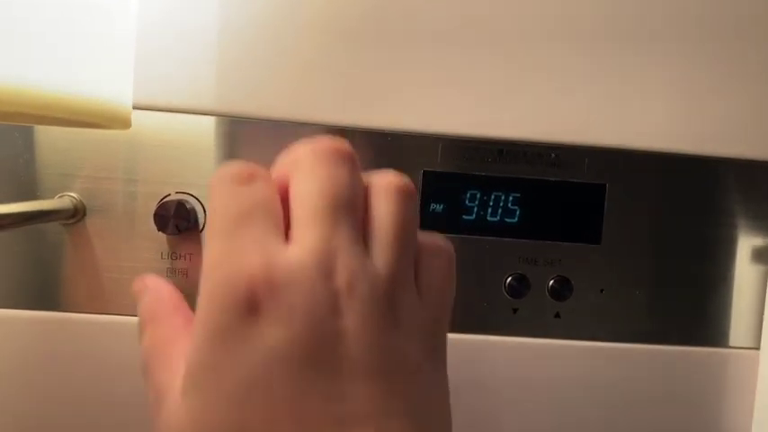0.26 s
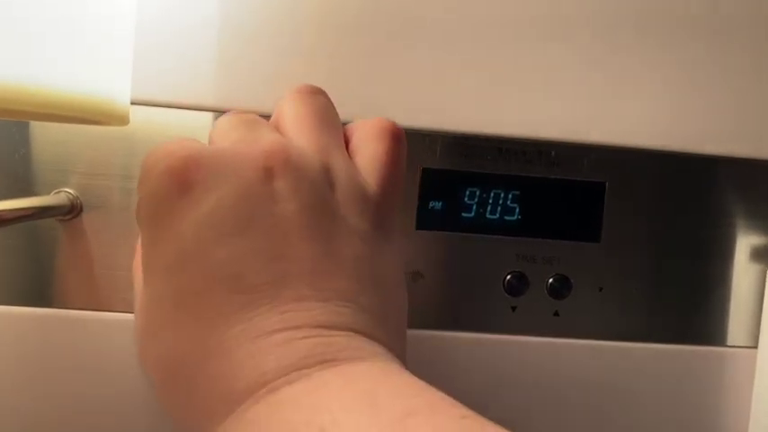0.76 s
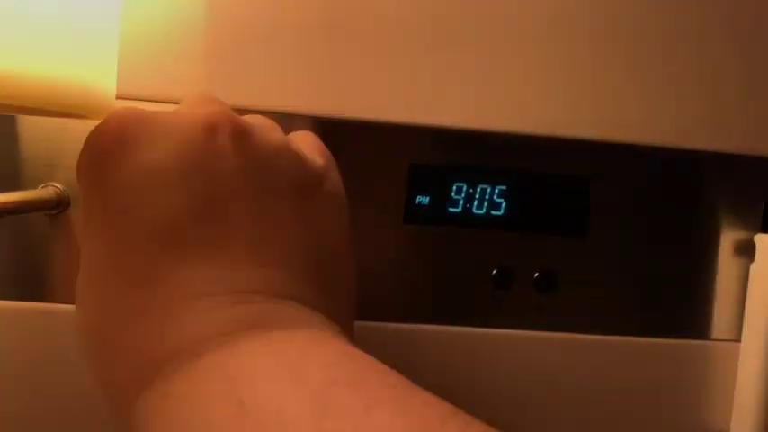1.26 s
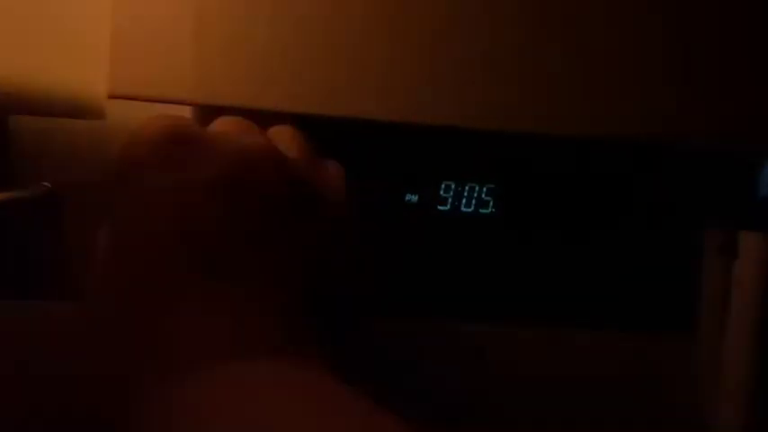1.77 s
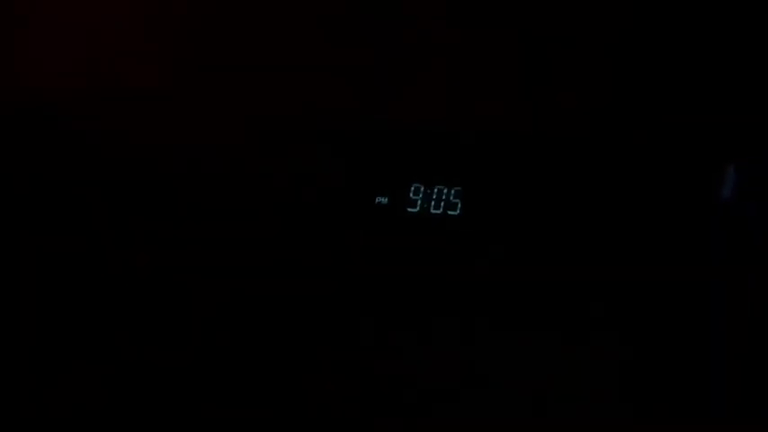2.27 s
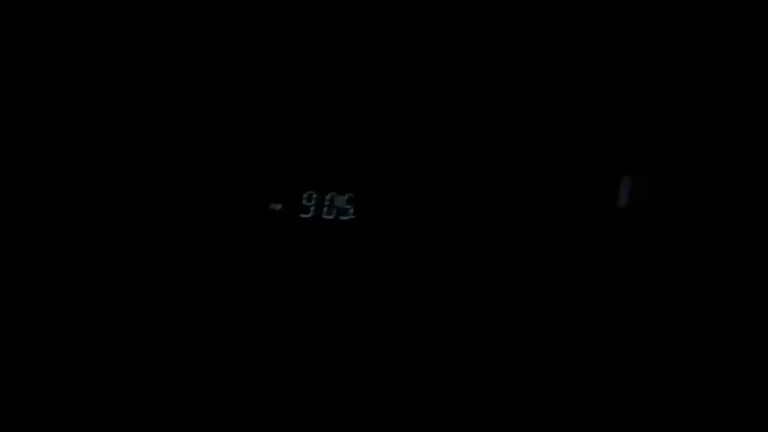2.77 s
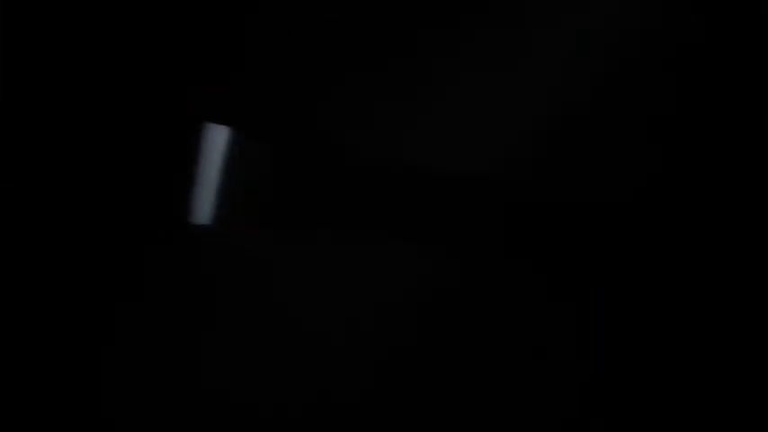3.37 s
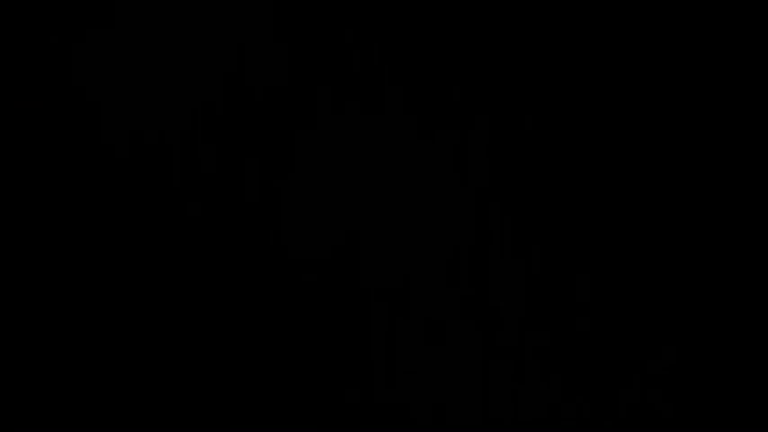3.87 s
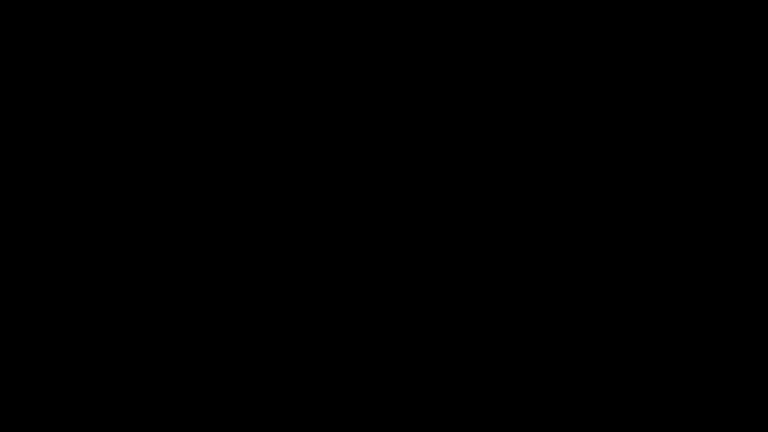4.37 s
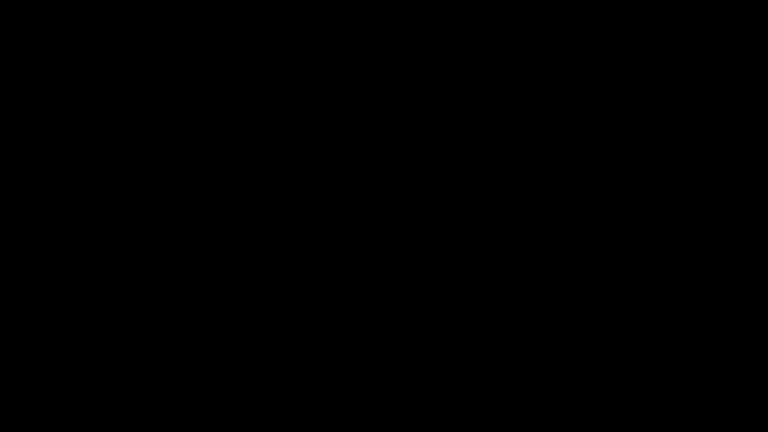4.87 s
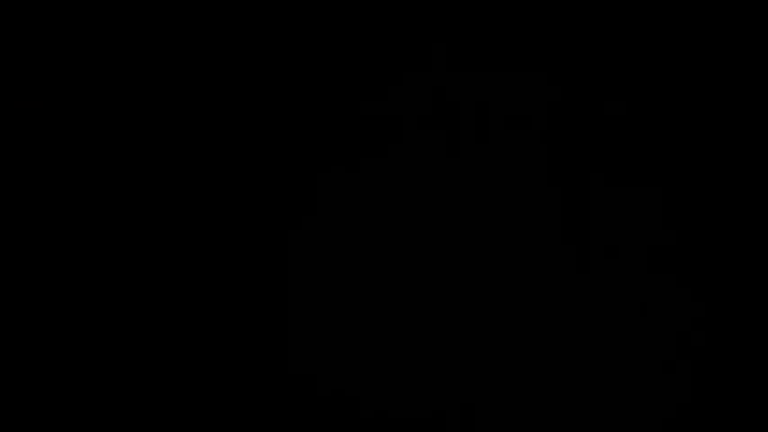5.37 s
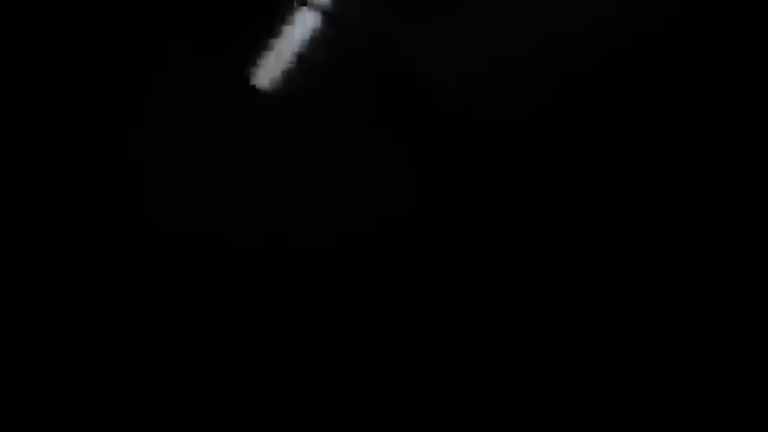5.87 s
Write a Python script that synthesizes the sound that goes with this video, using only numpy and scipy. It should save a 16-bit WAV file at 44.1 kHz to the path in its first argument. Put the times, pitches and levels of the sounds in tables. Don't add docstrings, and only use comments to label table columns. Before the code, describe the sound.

A rotary switch snaps over with a hard metallic clack in a small soft room, then cloth rushes and bumps close to the microphone.

```python
import sys
import numpy as np
from scipy import signal
from scipy.io import wavfile

SR = 44100
rng = np.random.default_rng(int(sys.argv[2]) if len(sys.argv) > 2 else 0)


def file_out(sig):
    cols = np.atleast_2d(sig).T
    lim = np.clip(cols, -1, 1)
    pcm = np.round(lim * 32767).astype(np.int16)
    wavfile.write(sys.argv[1], SR, pcm)


def amplitude_ratio(level_db):
    exponent = np.asarray(level_db, float) / 20
    return 10 ** exponent


N = 269451
LEFT_LAG = 20


def rms_one(x):
    return x / np.sqrt(np.mean(x ** 2) + 1e-20)


def in_time(rows):
    s, *columns = np.transpose(rows)
    return [np.interp(np.arange(N) / SR, s, c) for c in columns]


def at_hz(points, hz):
    points = np.array(points)
    return np.interp(np.log(hz), np.log(points[:, 0]), points[:, 1])


def band(x, low_hz, high_hz):
    edges = [low_hz, min(high_hz, .45 * SR)]
    return signal.sosfilt(signal.butter(2, edges, "band", fs=SR, output="sos"), x)


def low_pass(x, order, hz):
    return signal.sosfiltfilt(signal.butter(order, hz, fs=SR, output="sos"), x)


def drift(rate):
    r = np.exp(-80 * np.pi * rate / SR)
    slow = signal.lfilter([1], [1, -2 * r, r * r], rng.standard_normal(N // 40 + 2002))[2000:]
    return np.interp(np.arange(N) / 40, np.arange(len(slow)), rms_one(slow))


def ring(clicks, hz, t60):
    r = amplitude_ratio(-60 / (max(t60, .002) * SR))
    w = 2 * np.pi * hz / SR
    return signal.lfilter([0, np.sin(w)], [1, -2 * r * np.cos(w), r * r], clicks + 1e-18)


def clicks_at(times, db):
    clicks = np.zeros(N)
    clicks[np.round(np.array(times) * SR).astype(int)] = amplitude_ratio(np.array(db))
    return clicks


def at_time(s, sound, out):
    i = round(s * SR)
    return np.pad(sound, [(0, 0)] * (sound.ndim - 1) + [(i, N)])[..., :N] + out


def banded_noise(spectrum, patchy_db, shift_db=lambda hz: 0, source=None):
    # pitch in Hz, left-right likeness from -1 to 1.
    likeness = [(60, 0.2), (250, 0.58), (500, 0.31), (1200, 0.034), (3000, 0.036), (7000, 0.53),
                (15000, 0.031)]
    out, power, together = 0, 0, drift(7)
    edges = 22 * 2 ** np.arange(0, 9.6, .4)
    white = rng.standard_normal((2, 2, N)) * (1 if source is None else source)
    for k, (low, high) in enumerate(zip(edges, edges[1:])):
        mid, side = band(white[k % 2], low, high)
        hz = np.sqrt(low * high)
        alike = np.clip(at_hz(likeness, hz), -1, 1)
        pair = np.sqrt(1 + alike) * mid + np.sqrt(1 - alike) * side * [[1], [-1]]
        pair = amplitude_ratio(at_hz(spectrum, hz)) * pair
        power += np.mean(pair.mean(axis=0) ** 2)
        flicker_db = patchy_db * (.5 * together + (2.0 + 200 / hz) * drift(19.0))
        out = out + pair * amplitude_ratio(shift_db(hz) + flicker_db)
    return out / np.sqrt(power)


def ventilation():
    # pitch in Hz, level in dB per Hz.
    fan_spectrum = [(15, -40), (25, -16), (66, -10.5), (109, -10), (154, -21.5), (257, -26.5), (286, -27),
                    (438, -39), (673, -35.5), (833, -40.5), (978, -52.5), (1060, -44), (1720, -49),
                    (9520, -57.5), (15000, -58)]
    rumble_db, whine_db, whine_hz = -52.5, -97, 9780
    whine = amplitude_ratio(whine_db + 2.1 * drift(20)) * np.sin(2 * np.pi * whine_hz * np.arange(N) / SR)
    knots = np.log([150, 300, 700, 1500, 3000, 6300, 9000, 12000])
    cuts_db = [0, -1.5, -.5, -5, -8, -14, -10, -10.5]
    air = banded_noise(fan_spectrum, 0.49, lambda hz: np.interp(np.log(hz), knots, cuts_db))
    air = air + 0.52 * low_pass(air[::-1] - air, 2, 140)
    return amplitude_ratio(rumble_db + np.array([[1.3], [-1.3]])) * air + whine


def fidgets():
    # start in seconds, thud in dB, thud pitch in Hz, scuff in dB.
    touches = [(0.017, -70, 280, -92), (0.17, -66, 270, -73), (0.2, -74, 270, -74), (0.301, -60, 500, -92),
               (0.911, -60, 1000, -82), (0.95, -72, 700, -94), (1.078, -63, 400, -94),
               (1.148, -70, 650, -94), (1.195, -68, 400, -82), (1.294, -62, 650, -90),
               (1.303, -80, 700, -72), (1.315, -80, 700, -72), (1.424, -65, 1200, -88),
               (1.43, -66, 600, -90), (1.43, -71, 2100, -88), (1.455, -72, 2100, -90),
               (1.46, -66, 500, -94), (1.51, -72, 1400, -84), (1.53, -69, 1400, -76),
               (1.555, -68, 1350, -77), (1.6, -69, 800, -90), (2.0, -58, 800, -86), (2.004, -53, 330, -94),
               (2.03, -60, 330, -94), (2.38, -64, 270, -92), (2.674, -57, 700, -88), (2.682, -57, 750, -88),
               (2.7, -66, 2200, -90), (2.735, -56, 250, -90), (2.79, -66, 1800, -86), (2.86, -57, 350, -90),
               (2.96, -56, 400, -90), (3.195, -52, 700, -80), (3.235, -54, 750, -80)]
    attack_s, t60_s = 0.0012, 0.2
    fall_below, fall_above = 8, 13.5
    knock_db, knock_cycles = 3.5, 11.4
    registers = [(200, 308), (420, 597), (620, 890), (1100, 1460), (1800, 2620), (2900, 5000),
                 (7500, 15700)]
    noise = [rms_one(band(band(rng.standard_normal((2, N)), *edges), *edges)) for edges in registers]
    centres = np.sqrt(np.prod(registers[:-1], axis=1))
    age = np.arange(SR // 2) / SR
    shape = (1 - np.exp(-age / attack_s)) * amplitude_ratio(-60 * age / t60_s)
    out = np.zeros((2, N))
    for s, thud_db, hz, scuff_db in touches:
        span = slice(round(s * SR), round(s * SR) + len(age))
        octaves = np.log2(centres / hz)
        puff_db = thud_db - np.maximum(fall_above * octaves, -fall_below * octaves)
        levels = [*puff_db, scuff_db]
        out[:, span] += shape * sum(amplitude_ratio(db - 7.0) * n[:, span] for db, n in zip(levels, noise))
        knock = np.sin(2 * np.pi * hz * age) * amplitude_ratio(-60 * age * hz / knock_cycles)
        out[:, span] += amplitude_ratio(thud_db + knock_db) * knock
    return out


def switch():
    # start in seconds, peak in dB, brightness in dB,
    # boom of the hollow behind in dB.
    contacts = [(2.439, -52, -22, -22), (2.445, -41, -20, -18), (2.448, -41, -17, -8),
                (2.4547, -27.5, 9, -8), (2.4575, -22, 4, 2.5), (2.4607, -22.5, -15, -4.5),
                (2.464, -25, -10, -3), (2.4666, -22.5, -30, -12), (2.4705, -35.5, -14, 8),
                (2.477, -36.5, -13, -5), (2.483, -38.5, -24, 16), (2.495, -45.5, -28, 25),
                (2.503, -49.5, -32, 24), (2.519, -46, -30, 20.5), (2.531, -47.5, -32, 19),
                (2.541, -47.5, -36, 24.5)]
    # pitch in Hz, level in dB, t60 in seconds.
    modes = [(252, -6.5, 0.07), (277, -7.5, 0.079), (304, -7.5, 0.085), (356, -9.5, 0.097),
             (470, -7, 0.026), (594, -8, 0.044), (700, 3, 0.024), (880, -6, 0.02), (930, -2, 0.025),
             (1060, -5, 0.016), (1360, -1, 0.056), (1440, -6, 0.03), (2270, -10, 0.015), (2210, 4, 0.046),
             (2440, -1, 0.046), (2790, 3, 0.04), (2920, 6.5, 0.061), (3240, -11, .02), (3470, 5.5, 0.038),
             (3990, -15, 0.035), (4155, -20, 0.051), (4200, -26, 0.03), (6120, -18, 0.021),
             (12900, 2.5, 0.009)]
    s, db, bright_db, boom_db = np.transpose(contacts)
    chance_db = rng.normal(0, 3.3, (len(s), len(modes)))
    first = round(s[0] * SR)
    span = slice(first, first + SR // 2)
    out = np.zeros(N)
    for k, (hz, level_db, t60) in enumerate(modes):
        tilt_db = bright_db * np.clip(np.log2(hz / 1500) / 3, 0, 1) + boom_db * (hz < 420)
        blows = clicks_at(s, db + level_db - 10.0 + tilt_db + chance_db[:, k])
        out[span] += ring(blows[span], hz, t60)

    def burst(gain_db, t60):
        return signal.lfilter([1], [1, -amplitude_ratio(-60 / (t60 * SR))], clicks_at(s, db + gain_db))

    crack = burst(bright_db - 2.0, 0.0075) * band(rng.standard_normal(N), 2300, 28000)
    rattle = burst(1.3, 0.039) * band(rng.standard_normal(N), 840, 3200)
    return signal.sosfilt(signal.butter(2, 190, "high", fs=SR, output="sos"), out) + crack + rattle


def rush():
    # time in seconds, effort in dB, smoothness of the cloth as sheen in dB,
    # pressure of the hand as weight in dB.
    strokes = [(2.62, -77.5, -3, 29), (2.86, -74.5, 3.5, 2), (3.0, -65, 2, 2.5), (3.27, -56, -8.5, 13.5),
               (3.56, -52.5, -2, 3), (3.63, -51, -2, 1.5), (3.79, -55.5, -7, 2), (4.03, -52, -8.5, 2.5),
               (4.18, -57.5, -0.5, 5.5), (4.21, -53.5, -2.5, 5.5), (4.62, -45, -3, 2), (4.83, -48, 0, 1),
               (5.0, -55.5, -1, 3.5), (5.39, -53.5, -1.5, 2), (5.46, -55.5, -6, 3), (5.56, -51.5, 2, 4),
               (5.75, -50, -2, 6.5), (6.11, -53, -4, 3)]
    # pitch in Hz, level in dB per Hz.
    cloth_colour = [(110, -34), (180, -4.5), (238, 0.5), (370, -3.5), (399, -3), (988, -5), (1260, -6),
                    (4500, -9), (5630, -22.5), (6640, -17.5), (8000, -14), (9270, -17), (12900, -20),
                    (14200, -24), (15000, -30)]
    hiss_db, sheen_db, weight_db = in_time(strokes)
    s = np.arange(N) / SR
    begin_s = strokes[0][0]
    start = np.clip((s - begin_s) / 0.025, 0, 1)
    wander_per_s = 12.2
    body_db = 0.66 * weight_db + 0.8 * drift(wander_per_s)
    grip_from_s, grip_to_s, grip_ease_s, grip_db = 3.64, 5.53, 0.31, 4.5
    grip = np.clip(np.minimum(s - grip_from_s, grip_to_s - s) / grip_ease_s, 0, 1)
    lumps_db = grip_db * (grip - .5) + 0.44 * weight_db + 1 * drift(wander_per_s)
    knots = np.log([120, 700, 2500, 5500, 10000])
    parts = lumps_db, body_db, 0, 0, sheen_db

    def shift(hz):
        return sum(np.interp(np.log(hz), knots, np.eye(5)[k]) * p for k, p in enumerate(parts))

    grains = amplitude_ratio(1.05 * np.minimum(rng.exponential(1, N), 6))
    colour = [(30, 0.5), (70, 1.0), (105, -10.5), (150, 9)] + list(cloth_colour)[1:]
    pan_db = np.interp(s, [begin_s, 4], [3, 0.9])
    level = amplitude_ratio(hiss_db + 4.0 + pan_db * [[.5], [-.5]])
    return start * level * banded_noise(colour, 0.85, shift, grains)


def ticks_and_bumps():
    # start in seconds, peak in dB, low ring in Hz,
    # high ring in Hz, crack in dB.
    sharp_ticks = [
        (3.334, -36.5, 910, 3060, -6),
        (3.862, -35.5, 1004, 2540, -11),
        (3.8824, -28, 994, 3300, -7),
        (3.993, -37.5, 620, 2880, -7),
        (4.432, -30.5, 1060, 2660, -22),
        (5.309, -35, 595, 2180, -16),
        (5.412, -28, 700, 2560, -14),
        (5.569, -32, 690, 2830, -17),
        (5.604, -33, 1030, 2660, -13),
        (5.749, -34.5, 640, 2650, 0),
    ]
    # start in seconds, peak in dB, pitch in Hz.
    hand_bumps = [(2.857, -38, 62.3), (2.89, -66, 61.9), (3.35, -33, 700), (3.884, -36, 1450),
                  (3.9, -48, 280), (3.938, -33, 170), (3.94, -40, 525), (3.957, -32, 148),
                  (4.047, -29.5, 245), (4.099, -34, 132), (4.23, -35, 145), (4.429, -29, 313),
                  (4.463, -36, 317), (4.47, -29, 520), (4.515, -33, 58), (4.545, -33, 150),
                  (4.62, -31.5, 56.4), (4.639, -35, 390), (4.655, -35, 150), (4.691, -37, 140),
                  (4.752, -42, 109), (4.795, -41, 300), (4.826, -30.5, 83), (4.832, -30.5, 189),
                  (4.87, -32, 126), (4.9, -32.5, 95), (4.92, -33.5, 298), (4.964, -33.5, 350),
                  (5.068, -36, 79), (5.119, -53, 99), (5.411, -35.5, 136), (5.5, -36, 450),
                  (5.57, -31.5, 340), (5.681, -35, 418), (5.71, -36, 395), (5.74, -31, 380),
                  (5.775, -33.5, 388), (5.79, -32, 855), (5.83, -29, 1350), (5.855, -31, 444),
                  (5.89, -30.5, 784), (6.03, -37, 414), (6.055, -38, 397)]
    out = np.zeros(N)
    age = np.arange(SR // 8) / SR
    cracks = band(rng.standard_normal((len(sharp_ticks), len(age))), 5200, 13300)
    cracks = cracks * amplitude_ratio(-60 * age / 0.0057)

    def damped(hz, cycles):
        return np.sin(2 * np.pi * hz * age) * amplitude_ratio(-60 * age * hz / cycles)

    for (s, db, low_hz, high_hz, crack_db), crack in zip(sharp_ticks, cracks):
        rings = damped(low_hz, 8.9) + amplitude_ratio(2.5) * damped(high_hz, 30.0)
        out = at_time(s, amplitude_ratio(db - 6.0) * (rings + amplitude_ratio(crack_db + 4.5) * crack), out)
    for s, db, hz in hand_bumps:
        out = at_time(s, amplitude_ratio(db + 4.0) * age * hz * damped(hz, 4.5), out)
    return out


def moan():
    # time in seconds, pitch in Hz, level in dB.
    hum = [
        (3.3, 436.5, -73),
        (3.351, 439.5, -52.5),
        (3.402, 480, -50),
        (3.463, 461, -52),
        (3.49, 473, -54.5),
        (3.6, 443, -45.5),
        (3.7, 413.5, -49.5),
        (3.77, 451.4, -53),
        (3.83, 433.6, -48),
    ]
    hz, db = in_time(hum)
    s = np.arange(N) / SR
    fade = np.clip(np.minimum(s - hum[0][0], hum[-1][0] - s) / 0.041, 0, 1)
    phase = 2 * np.pi * np.cumsum(hz) / SR
    tone = 0.45 * np.sin(phase)
    smear = 1.14 * drift(34) * np.sin(phase) + 0.99 * drift(24) * np.cos(phase)
    return fade * amplitude_ratio(db - 4.5) * (tone + smear)


def room(x):
    # pitch in Hz, t60 in seconds.
    decay = [(200, 0.25), (600, 0.16), (1200, 0.18), (4000, 0.25), (12000, 0.16), (14000, 0.072),
             (15500, .03)]
    echo_db, build_s = -17, 0.0061
    age = np.arange(SR // 2) / SR
    edges = 100 * 2 ** np.arange(0, 8, .5)
    white = rng.standard_normal((2, 2, len(age)))
    tail = 0
    for k, (low, high) in enumerate(zip(edges, edges[1:])):
        t60 = at_hz(decay, np.sqrt(low * high))
        tail = tail + band(white[k % 2], low, high) * amplitude_ratio(-60 * age / t60)
    echoes = amplitude_ratio(echo_db) * np.clip(age / build_s, 0, 1) * tail
    return signal.fftconvolve([x, x], echoes, axes=1)[:, :N]


def merged(x):
    merge_hz, top_hz = 12600, 15500
    mid, side = (x[0] + x[1]) / 2, (x[0] - x[1]) / 2
    side = low_pass(side, 3, merge_hz)
    steep = signal.cheby2(8, 40, top_hz + 500, fs=SR, output="sos")
    return signal.sosfilt(steep, [mid + side, mid - side])


def late(x):
    return np.array([np.pad(x[0], (LEFT_LAG, 0))[:N], x[1]])


def scene():
    snap = switch()
    near = ticks_and_bumps() + moan()
    wet = room(amplitude_ratio(-17.5) * snap + amplitude_ratio(-13.0) * near)
    shared = signal.sosfilt(signal.butter(1, 350, fs=SR, output="sos"), wet[::-1] - wet) / 2
    apart = amplitude_ratio(-0.5) * band(wet - wet[::-1], 375, 2250)
    walls = wet * amplitude_ratio([[1.2], [-1.2]]) + 1.06 * shared + apart
    boom = (amplitude_ratio(9 * np.array([[.5], [-.5]])) - 1) * band(snap, 100, 390)
    direct = snap * amplitude_ratio([[1.0], [0]]) + near * amplitude_ratio([[3.0], [2.0]])
    low = low_pass(direct, 2, 1270)
    hits = direct - low + walls + amplitude_ratio(3.5) * fidgets()
    together = np.pad(low + boom, [(0, 0), (LEFT_LAG // 2, 0)])[:, :N]
    steady = merged(late(amplitude_ratio(1.0) * rush() + ventilation()))
    return late(hits) + together + steady


def roll_off(x):
    return signal.sosfilt(signal.butter(12, 16380, fs=SR, output="sos"), x)


def record(dry):
    # pitch in Hz, width in Hz, level in dB.
    port_peaks = [(5670, 470, -2.5), (6240, 1560, 9), (8100, 2030, -7)]
    x = signal.sosfilt(signal.butter(3, 38, "high", fs=SR, output="sos"), dry)
    for hz, width_hz, db in port_peaks:
        x = x + (amplitude_ratio(db) - 1) * signal.lfilter(*signal.iirpeak(hz, hz / width_hz, SR), x)
    x = signal.sosfilt(signal.butter(6, 14600, fs=SR, output="sos"), x)
    x = .3 * np.tanh(x / .3)
    return roll_off(x)


dry = scene()
out = record(dry)
file_out(out)
```